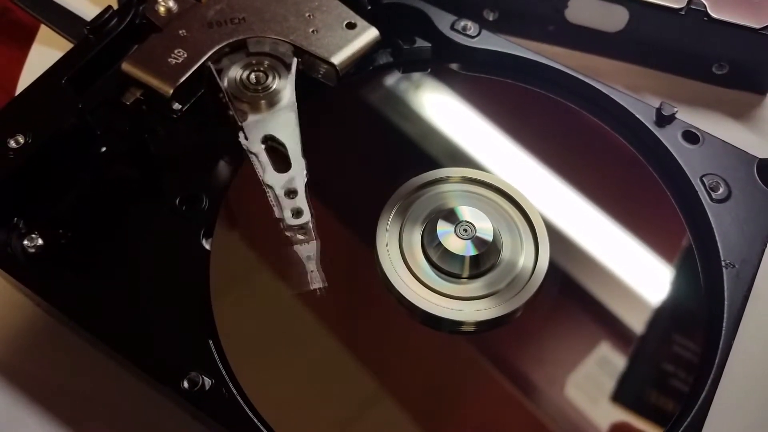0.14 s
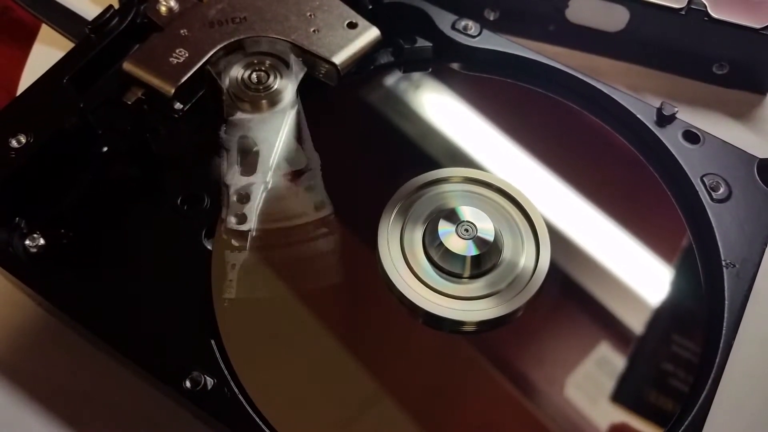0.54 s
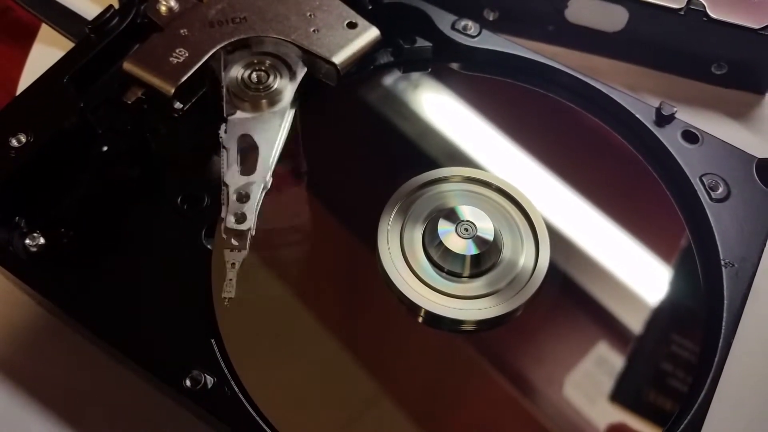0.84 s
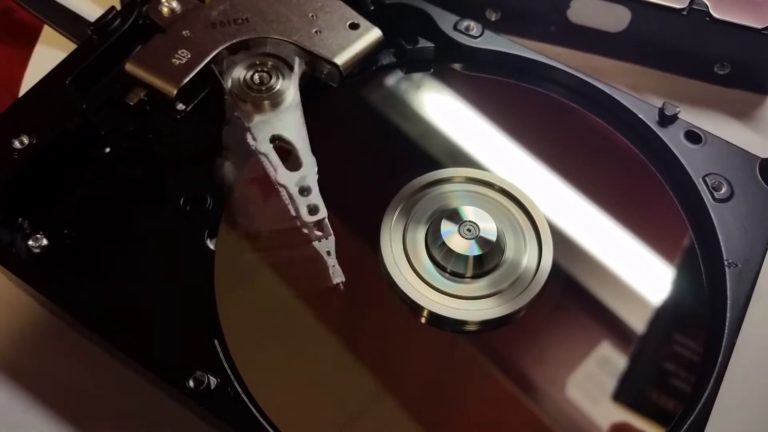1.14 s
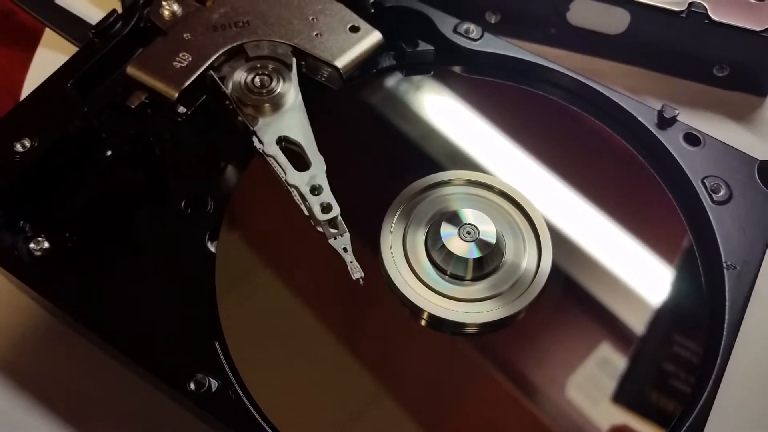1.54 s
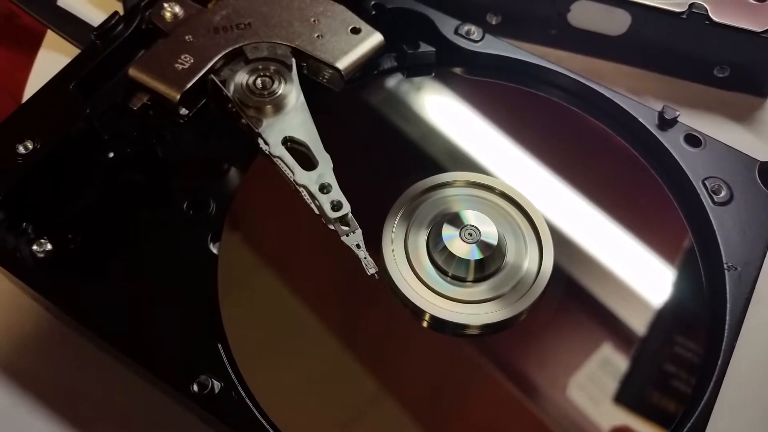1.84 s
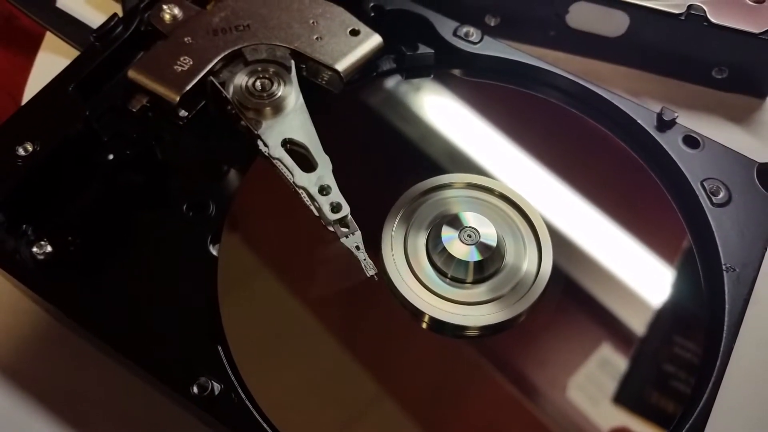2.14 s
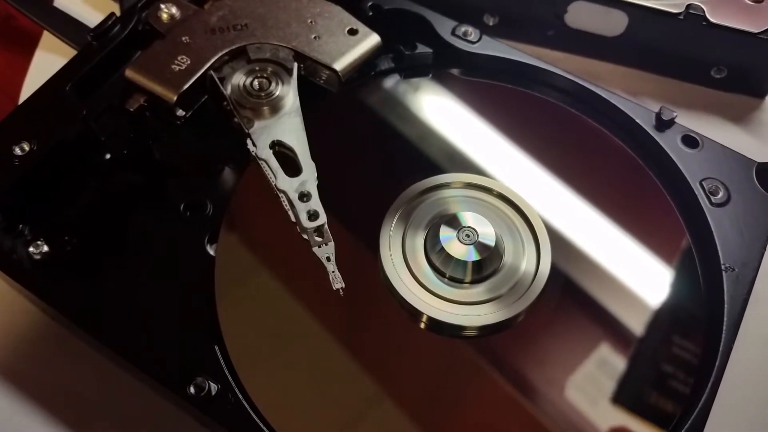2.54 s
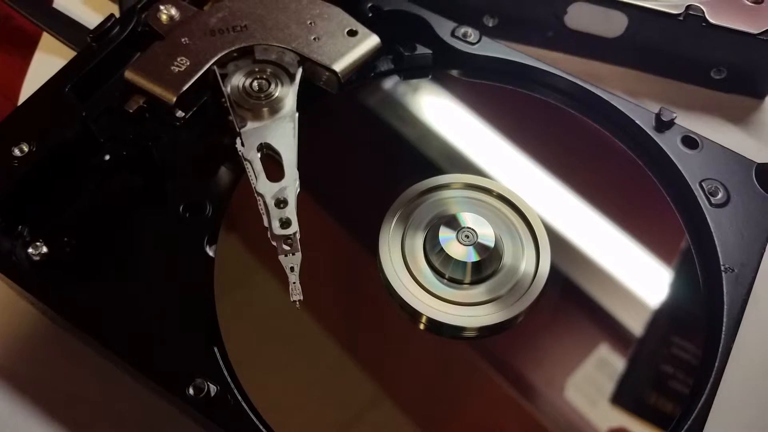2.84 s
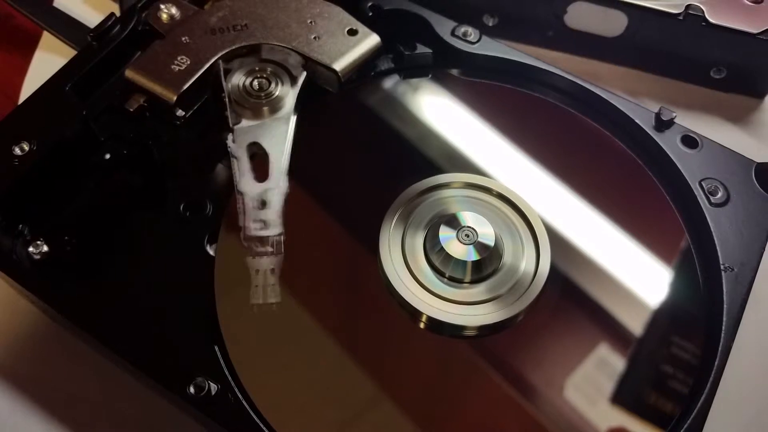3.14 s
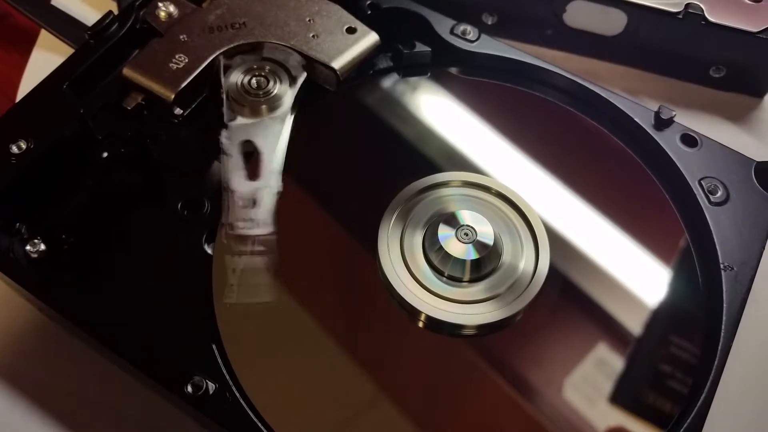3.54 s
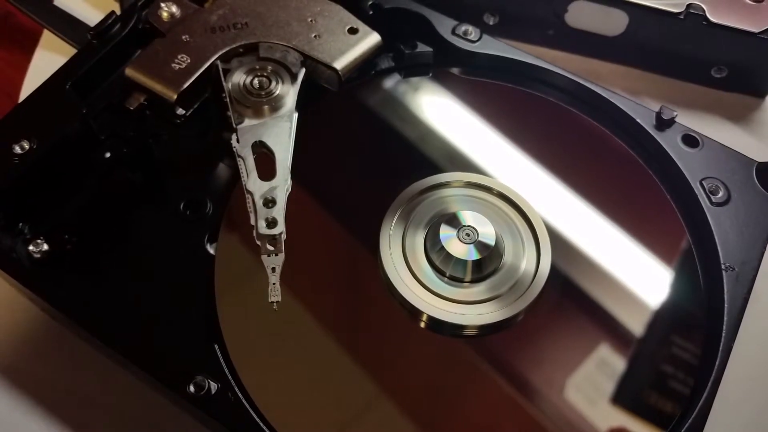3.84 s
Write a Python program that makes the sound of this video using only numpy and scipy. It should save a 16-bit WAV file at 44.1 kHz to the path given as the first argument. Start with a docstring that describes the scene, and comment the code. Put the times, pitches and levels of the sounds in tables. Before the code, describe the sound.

An opened hard disk drive clicks and chatters rapidly, with short raspy buzzes over a faint hum.

```python
"""The head arm of an opened hard disk drive seeks, heard from close by: kick, reversal and brake are impulses
that excite the modes of arm and casing. Fast runs of such moves merge into a buzz. Now and then two damped
modes ping: some pings stand alone, as the arm strikes a stop, and three sound within the long buzz.
Each seek also rocks the drive with a low, decaying knock. Under it the spindle hums as three sine lines, and
the air stirred by the platter is noise of flickering level. A decaying noise tail gives the arm a small room."""
import sys
import numpy as np
from scipy import signal
from scipy.fft import rfft, irfft
from scipy.io import wavfile

SR = 44100
rng = np.random.default_rng(int(sys.argv[2]) if len(sys.argv) > 2 else 0)


def store_pcm(level_fs):
    """Save levels as 16-bit WAV."""
    pcm = np.round(np.clip(level_fs, -1, 1) * 32767).astype(np.int16)
    wavfile.write(sys.argv[1], SR, np.atleast_2d(pcm).T)


N = 176400

# Spindle lines: (f/Hz, rms level/dB before swell and waver)
SPINDLE_LINES = [(119.8, -43.5), (240, -58), (2153, -61.5)]
# Slow swell of the spindle lines: (t/s, level/dB)
SPINDLE_SWELL = [(0, -9.5), (1.2, 0), (2.7, 2.5), (4, -4.5)]
# Air around the platter: (f/Hz, spectral density level/dB re 1 per Hz, left over right/dB)
AIR_SPECTRUM = [(30, -69, 8), (86, -69, -4), (107, -62.5, -5), (171, -69.5, 2), (256, -70.5, 1.5),
                (495, -77, 1.5), (684, -80, 4), (1280, -81, 7), (1810, -63.5, 7.5), (2220, -78.5, -0.5),
                (2760, -84, -3), (3030, -74, -4), (4470, -79, -2), (4750, -69.5, 3.5), (5310, -80.5, -4),
                (6860, -77.5, 8), (9800, -81, -0.5), (12600, -84.5, 1), (14500, -91.5, 5)]
# Correlation of the air noise between the channels: (f/Hz, correlation/1)
AIR_CORRELATION = [(60, 0.9), (240, 0.67), (950, 0.37), (3760, 0.11), (14900, 0.01)]
# Modes of arm and casing: (f/Hz, bandwidth/Hz, level/dB within the register, left over right/dB, left lead/rad)
ARM_MODES = [(979, 25.6, -19.5, 10.5, 1.3), (1147, 28, -26.5, 3, 1), (1498, 59.5, -11.5, 10.5, -5.5),
             (1692, 160, -20.5, 1, 6), (1835, 50, -14.5, 3.5, -3.5), (2200, 45, -17.5, -2, 2.5),
             (2470, 26, -26, -2, 1.4), (2882, 38, -13.5, 12, 4), (3235, 170, -6.5, -9, 3.5),
             (3502, 137, -5.5, -0.5, -1.1), (3484, 30, -16, 8, -0.2), (3575, 360, -15, -13, -3),
             (3844, 170, -15, -9.5, 0.8), (3976, 76, -14, 6, -5), (4810, 550, -18, 6.5, 1.04),
             (5317, 200, -15, 16, 7.5), (6293, 380, -14, 11, -0.04), (6650, 298, -8.5, 4, -5.5),
             (7310, 340, -18.5, 10.5, 3), (8520, 1430, -31, -3, 1.5), (13410, 230, -25, 19, 7)]
# Edges of the four registers, low, upper low, middle and treble: (f/Hz)
REGISTER_EDGES = [940, 1700, 2600, 4400, 16000]
# Single seeks: (t/s, level/dB before the register levels, travel time/s, treble re middle/dB, likewise)
SEEK_MOVES = [(0.0001, -18, 0.0034, -3.5), (0.025, -25.5, 0.0028, -17), (0.0329, -21, 0.0029, -1.5),
              (0.07, -24.5, 0.0025, -7), (0.0805, -20, 0.0026, -1.5), (0.0881, -21.5, 0.0033, 3),
              (0.1254, -28, 0.0031, -14), (0.134, -22.5, 0.0025, 1), (0.1532, -24, 0.0034, -11),
              (0.2448, -25, 0.0034, 0), (0.2742, -22.5, 0.0031, -1.5), (0.3351, -18.5, 0.008, -11),
              (0.4162, -21, 0.0047, -8), (0.4265, -18.5, 0.003, -3), (0.4346, -21, 0.0027, 1),
              (0.4705, -21.5, 0.0048, -6), (0.483, -18, 0.0036, -4.5), (0.5199, -22, 0.0026, 0.5),
              (0.5574, -22.5, 0.0031, -1.5), (0.58, -24.5, 0.0038, -16), (0.5961, -18, 0.0024, -4),
              (0.599, -30, 0.005, 8.5), (0.608, -19.5, 0.0029, 3), (0.6319, -22.5, 0.0052, -12),
              (0.6481, -22, 0.0024, 0.5), (0.6663, -19, 0.0077, -13), (0.7029, -20.5, 0.008, -14),
              (0.756, -25, 0.0033, -7), (0.764, -18.5, 0.0038, -7), (0.7986, -21, 0.0018, -3),
              (0.813, -25, 0.0039, -8), (0.8255, -19, 0.004, -3), (0.8562, -25, 0.0019, -7),
              (0.8676, -18.5, 0.0026, -3), (0.8948, -19, 0.0027, -3.5), (0.9027, -23.5, 0.0033, 2),
              (0.9428, -20, 0.0025, -1), (0.9887, -22, 0.0026, -6), (1.0009, -24.5, 0.0021, -8),
              (1.0093, -24, 0.0019, 1.5), (1.0138, -18.5, 0.0027, -5), (1.0442, -22, 0.0021, -1.5),
              (1.0698, -23, 0.0036, -4.5), (1.118, -26.5, 0.0029, -2), (1.122, -24.5, 0.0036, -19),
              (1.1533, -25, 0.0024, -3.5), (1.1783, -22, 0.0068, -10), (1.2065, -25, 0.0043, -8),
              (1.2295, -24, 0.0034, -5), (1.4155, -31, 0.0024, -2), (1.428, -19.5, 0.0083, -19),
              (1.4877, -22, 0.0045, -7), (1.5008, -19, 0.0026, 0), (1.577, -23, 0.0023, -4.5),
              (1.6022, -20.5, 0.0074, -17), (1.8658, -22.5, 0.0013, 7), (1.8717, -24, 0.0026, -2.5),
              (2.2648, -19.5, 0.0039, -4.5), (2.3278, -21, 0.0026, -1), (2.3409, -22.5, 0.0048, -7),
              (2.3503, -20, 0.0016, -3), (2.3901, -22.5, 0.0023, -0.5), (2.4453, -30, 0.004, -8),
              (2.4596, -20, 0.0023, -1.5), (2.5248, -19, 0.0019, -3.5), (2.7721, -26.5, 0.0039, -13),
              (2.7859, -18, 0.0043, -1.5), (2.843, -22, 0.0048, -6), (2.8515, -23, 0.0025, 5.5),
              (2.8579, -25.5, 0.0059, -11), (3.223, -28, 0.0029, -8), (3.2312, -17, 0.0064, -1),
              (3.2562, -21.5, 0.0041, -1.5), (3.2679, -17, 0.0048, 2), (3.3043, -20.5, 0.0015, -3.5),
              (3.3236, -23, 0.0055, -6), (3.3308, -22, 0.0023, -8), (3.395, -21, 0.002, -1),
              (3.523, -23, 0.0043, -1.5), (3.5307, -22, 0.003, -10), (3.5524, -24, 0.0064, -6.5),
              (3.561, -20, 0.0048, -2), (3.599, -19.5, 0.0046, -7), (3.6327, -24, 0.0019, -1.5),
              (3.6492, -18.5, 0.0028, -13), (3.6541, -26.5, 0.0022, 3), (3.6727, -23.5, 0.0027, -10)]
# Register levels of a seek: one level/dB each for low, upper low, middle, treble
SEEK_REGISTER_LEVELS = [-8.5, -11.5, -1, -1.55]
# Recoil of the drive re the move that causes it: (t/s, level/dB)
RECOIL_LEVEL = [(0, -18), (1, -11), (2.85, -12.5), (3.3, -17)]
# Runs of back-to-back seeks: (start t/s, end t/s, level/dB before the register levels)
SEEK_RUNS = [(0.178, .191, -19), (.188, 0.216, -16.5), (0.347, 0.39, -16), (.673, 0.683, -16),
             (0.715, 0.731, -16), (1.244, 1.384, -16.5), (1.435, 1.456, -16.5), (1.593, 1.816, -16.5),
             (3.411, 3.488, -17.5)]
# Register levels of a run: one level/dB each for low, upper low, middle, treble
RUN_REGISTER_LEVELS = [-15.5, -13, 0, -2]
# Pings near 1930 Hz, some alone, three within the long buzz: (t/s, level/dB re the mode levels)
PINGS = [(1.127, -16.5), (1.1805, -15), (1.206, -15.5), (1.643, -21.5), (1.762, -25), (1.783, -23),
         (2.475, -13.5)]
# Modes of a ping: (f/Hz, level/dB, 60 dB decay time/s)
PING_MODES = [(1930, 2.5, 0.08), (2150, -12, 0.018)]

HUM_WAVER_DB, HUM_WAVER_S = 1.5, 0.07   # standard deviation and spacing of the random level steps
AIR_FLICKER_DB, AIR_FLICKER_S = 1, 0.036   # the same, for each half octave of air
DIP_FROM_HZ, DIP_DB = 450, -30   # the low middle of the rush, 450 to 900 Hz, falls away under long buzzes
DIP_DELAY_S, DIP_FADE_S = 0.0082, 0.015
KICK_DB, BRAKE_DB, GRIT_DB = -4.5, -4.5, -3.5   # re the reversal
REVERSAL_SHARE = 0.4   # place of the reversal within the travel time
KICK_JITTER_S, KICK_SPREAD_DB = 0.00012, 2   # standard deviations of time and level
RATTLE_DB, RATTLE_T60_S = -7, 0.037   # scattered ring of the casing, before each ear is levelled
FIZZ_DB, FIZZ_T60_S, FIZZ_ABOVE_HZ = -12.5, 0.018, 7400   # crowded top modes of the thin suspension
CHASSIS_HZ, CHASSIS_T60_S = 293, 0.13
CHASSIS_SCATTER = 0.035   # relative spread of the recoil frequency between seeks
RUN_SEEKS_PER_S, RUN_WANDER, RUN_WANDER_S = 383, 0.012, 0.033   # mean rate, relative drift, drift spacing
RUN_GRIT_DB = -8   # re the reversal
RUN_TONE_DB = -22.5   # peak of the chassis tone re the run level
PING_ATTACK_S = 0.00047
ROOM_DB, ROOM_T60_S = -12.5, 0.15
CUTOFF_HZ = 14500
RING_T = np.arange(4096) / SR   # time axis of the impulse responses, s
SIDES = np.array([[1], [-1]])   # signs of left and right


def from_db(db):
    """Logarithmic level: 20 dB correspond to a tenfold amplitude."""
    return 10 ** (np.asarray(db) / 20)


def unit(x):
    """Energy normalisation: the summed square, averaged over the channels, becomes one."""
    return x / np.sqrt(np.mean(np.sum(x ** 2, axis=-1)) + 1e-20)


def at_hz(rows, hz, axis=1):
    """Interpolation of a table column on a logarithmic frequency scale."""
    rows = np.array(rows)
    return np.interp(np.log(hz + 1), np.log(rows[:, 0]), rows[:, axis])


def add(out, s, x):
    """Superposition: x is added to out from time s on."""
    i = int(s * SR)
    out[..., i:i + x.shape[-1]] += x[..., :N - i]


def flicker(db, every_s):
    """Random modulation: a level in dB runs linearly between independent normal steps."""
    steps = rng.standard_normal(size=512)
    return db * np.interp(np.arange(N) / SR / every_s, np.arange(len(steps)), steps)


def spindle():
    """Line spectrum of a rotating motor: sine lines share one slow swell and a random waver."""
    t = np.arange(N) / SR
    swell_db = np.interp(t, *np.transpose(SPINDLE_SWELL)) + flicker(HUM_WAVER_DB, HUM_WAVER_S)
    hum = np.zeros(N)
    for hz, db in SPINDLE_LINES:
        amplitude = np.sqrt(2) * from_db(db + swell_db)   # rms to peak
        hum += amplitude * np.sin(2 * np.pi * hz * t)
    return hum


def air():
    """Flow noise: Gaussian noise coloured by the casing, its channels less correlated towards the treble."""
    hz = np.arange(N // 2 + 1) * SR / N
    mid, side = rfft(rng.standard_normal((2, N)))
    correlation = at_hz(AIR_CORRELATION, hz)
    stereo = np.sqrt(1 + correlation) * mid + SIDES * np.sqrt(1 - correlation) * side
    level_db = at_hz(AIR_SPECTRUM, hz) + SIDES * at_hz(AIR_SPECTRUM, hz, axis=2) / 2
    gain = from_db(level_db) * np.sqrt(SR) / 2   # density to amplitude
    return irfft(gain * stereo, N)


def wavering(rush):
    """Band-wise modulation: half octaves flicker independently; the low middle falls away under long buzzes."""
    t = np.arange(N) / SR
    buzzing = np.zeros(N)
    for start, end, _ in SEEK_RUNS:
        inside_s = np.minimum(t - start - DIP_DELAY_S, end - t)
        buzzing += np.clip(inside_s / DIP_FADE_S, 0, 1)   # the shortest runs barely count
    hz = np.maximum(np.arange(N // 2 + 1) * SR / N, DIP_FROM_HZ / 2)   # all the bass joins the lowest band
    band = np.floor(2 * np.log2(hz / DIP_FROM_HZ))
    spectrum = rfft(rush)
    out = np.zeros((2, N))
    for k in np.unique(band):
        level_db = flicker(AIR_FLICKER_DB, AIR_FLICKER_S)
        if k in (0, 1):
            level_db = level_db + DIP_DB * buzzing
        out += from_db(level_db) * irfft(spectrum * (band == k), N)
    return out


def diffuse(x, t60):
    """Diffuse decay: convolution with exponentially dying noise, independent at each ear."""
    t = np.arange(SR // 2) / SR
    tail = unit(rng.standard_normal((2, len(t))) * from_db(-60 * t / t60))
    return signal.fftconvolve(x, tail, axes=1)[:, :N]


def cased(response):
    """Multiple scattering: the casing adds a dense ring while each ear keeps its standard deviation."""
    scattered = response + from_db(RATTLE_DB) * diffuse(response, RATTLE_T60_S)[:, :len(RING_T)]
    return scattered * response.std(axis=1, keepdims=True) / scattered.std(axis=1, keepdims=True)


def arm_body():
    """Modal superposition: damped resonances form a stereo impulse response in each of four registers."""
    # small parts radiate no bass
    no_bass = signal.ellip(6, 1, 50, REGISTER_EDGES[0], "high", fs=SR, output="sos")
    rings = []
    for hz, width, db, pan, lead in ARM_MODES:
        envelope = from_db(db + SIDES * pan / 2) * width * np.exp(-np.pi * width * RING_T)
        mode = envelope * np.cos(2 * np.pi * hz * RING_T + SIDES * lead / 2)
        rings.append((hz, cased(mode)))
    registers = []
    for lo, hi in zip(REGISTER_EDGES, REGISTER_EDGES[1:]):
        register = sum(r for hz, r in rings if lo < hz <= hi)
        registers.append(unit(signal.sosfilt(no_bass, register)))
    fizz = rng.standard_normal((2, len(RING_T))) * from_db(-60 * RING_T / FIZZ_T60_S)
    fizz_band = signal.butter(2, [FIZZ_ABOVE_HZ, CUTOFF_HZ], "band", fs=SR, output="sos")
    registers[-1] = registers[-1] + from_db(FIZZ_DB) * unit(signal.sosfilt(fizz_band, fizz))
    return registers


def move(travel_s, grit_db):
    """Impulsive excitation: kick, opposed reversal and brake, with noise as grit while the arm travels."""
    t = RING_T[:len(RING_T) // 8]
    grit = rng.standard_normal(len(t)) * np.exp(-(t / travel_s) ** 2)
    force = from_db(grit_db) * unit(grit)
    for share, db, sign in ((0, KICK_DB, 1), (REVERSAL_SHARE, 0, -1), (1, BRAKE_DB, 1)):
        i = int(abs(share * travel_s + KICK_JITTER_S * rng.normal()) * SR)
        force[min(i, len(t) - 1)] += sign * from_db(db + KICK_SPREAD_DB * rng.normal())
    return force


def radiate(force, body, levels_db):
    """Linear response: the force is convolved with each register, which then takes its own level."""
    registers = [unit(signal.fftconvolve(force[None], part, axes=1)) for part in body]
    return sum(from_db(db) * register for register, db in zip(registers, levels_db))


def ring(hz, t60):
    """Free vibration: a sine with exponential decay."""
    return np.sin(2 * np.pi * hz * RING_T) * from_db(-60 * RING_T / t60)


def recoil(s, db, hz):
    """Reaction to the arm: the whole drive rocks as one damped mode, a low knock."""
    return from_db(db + np.interp(s, *np.transpose(RECOIL_LEVEL))) * ring(hz, CHASSIS_T60_S)


def seeks(body):
    """Transient excitation: each single move clicks through the body and rocks the chassis either way."""
    out = np.zeros((2, N))
    click_size = np.sqrt(0.01 * SR)   # levels are rms values over 10 ms
    for s, db, travel_s, treble_db in SEEK_MOVES:
        levels_db = db + np.array([0, 0, 0, treble_db]) + SEEK_REGISTER_LEVELS
        add(out, s, click_size * radiate(move(travel_s, GRIT_DB), body, levels_db))
        direction = rng.choice([-1, 1])
        rock_hz = CHASSIS_HZ * (1 + CHASSIS_SCATTER * rng.normal())
        add(out, s, direction * recoil(s, db, rock_hz))
    return out


def runs(body):
    """Repetition pitch: moves without a pause, at a drifting rate, buzz; the chassis hums at that rate."""
    out = np.zeros((2, N))
    for start, end, db in SEEK_RUNS:
        t = np.arange(int((end - start) * SR)) / SR
        drift = rng.standard_normal(size=32)
        wander = RUN_WANDER * np.interp(t / RUN_WANDER_S, np.arange(len(drift)), drift)
        moves_done = np.cumsum(RUN_SEEKS_PER_S * (1 + wander)) / SR
        force = np.zeros(len(t) + len(RING_T))
        # a move starts whenever the count passes a whole number
        for s in np.interp(np.arange(moves_done[-1]), moves_done, t):
            add(force, s, move(0.5 / RUN_SEEKS_PER_S, RUN_GRIT_DB))
        buzz = radiate(force, body, db + np.array(RUN_REGISTER_LEVELS))
        add(out, start, np.sqrt(len(t)) * buzz)   # levels are rms values over the run
        tone = np.sin(2 * np.pi * moves_done) * signal.windows.tukey(len(t))
        add(out, start, from_db(db + RUN_TONE_DB) * tone)
        add(out, end, recoil(end, db, CHASSIS_HZ))
    return out


def pings():
    """Damped free vibration: two metallic modes build up softly within a millisecond or so, then decay."""
    out = np.zeros((2, N))
    attack = 1 - np.exp(-RING_T / PING_ATTACK_S)
    for s, db in PINGS:
        ping = sum(from_db(db + mode_db) * ring(hz, t60) for hz, mode_db, t60 in PING_MODES)
        add(out, s, attack * ping)
    return out


def scene():
    """Superposition of sources: spindle and air, then the arm with its reverberation in a small room."""
    background = spindle() + wavering(air())
    body = arm_body()
    arm = seeks(body) + runs(body) + pings()
    room = from_db(ROOM_DB) * diffuse(arm, ROOM_T60_S)
    return background + arm + room


def record(dry):
    """Band limitation: a steep elliptic low-pass removes the top."""
    return signal.sosfilt(signal.ellip(10, 0.2, 80, CUTOFF_HZ, fs=SR, output="sos"), dry)


dry = scene()
out = record(dry)
store_pcm(out)
```